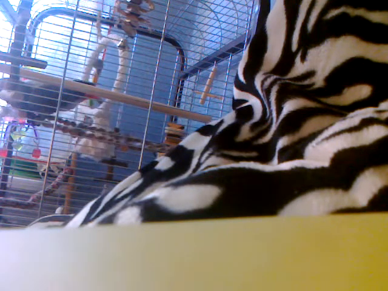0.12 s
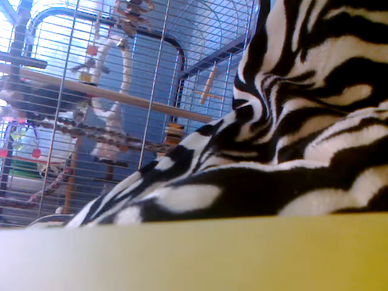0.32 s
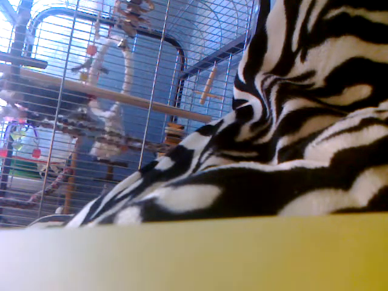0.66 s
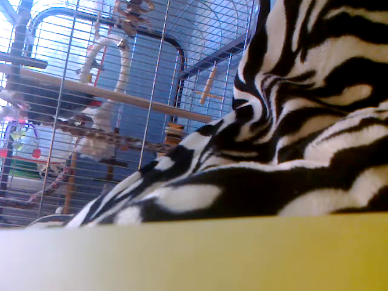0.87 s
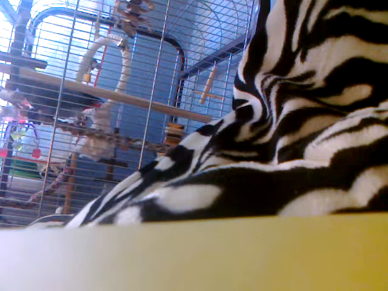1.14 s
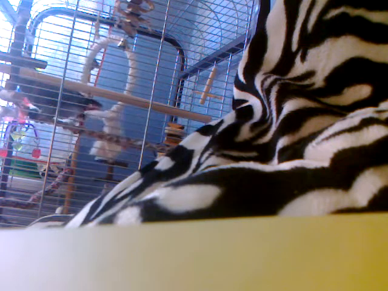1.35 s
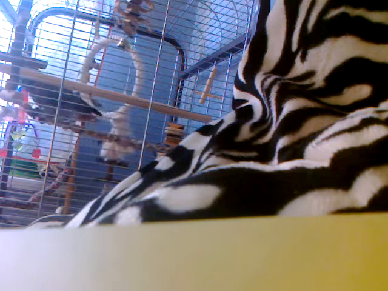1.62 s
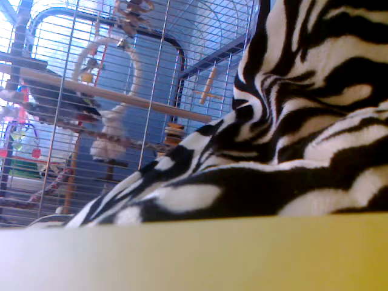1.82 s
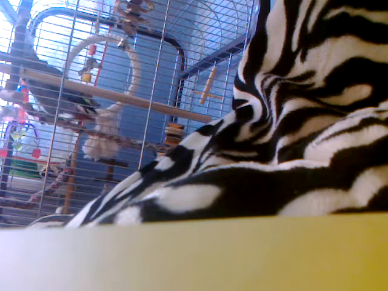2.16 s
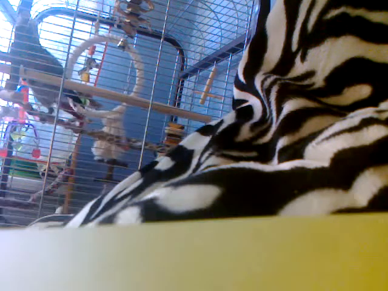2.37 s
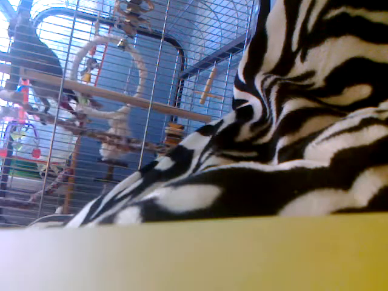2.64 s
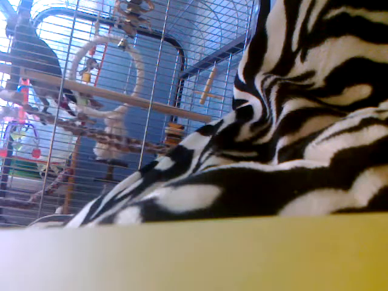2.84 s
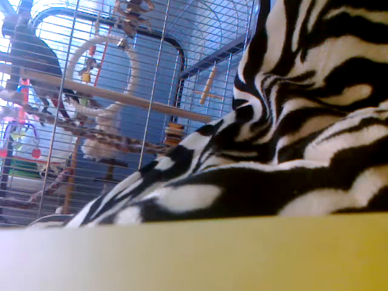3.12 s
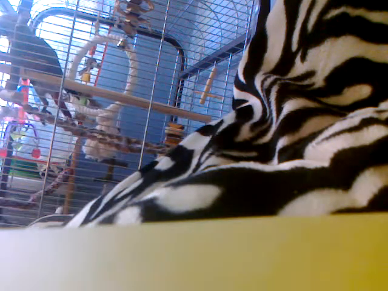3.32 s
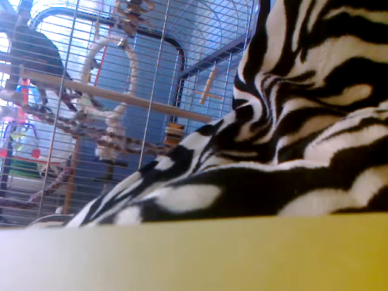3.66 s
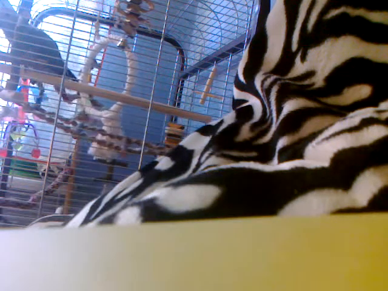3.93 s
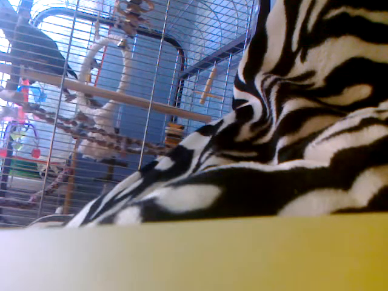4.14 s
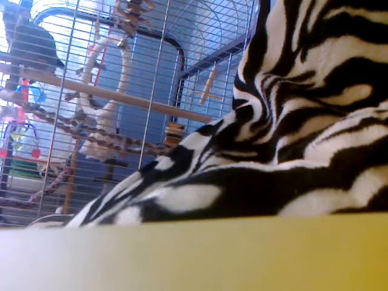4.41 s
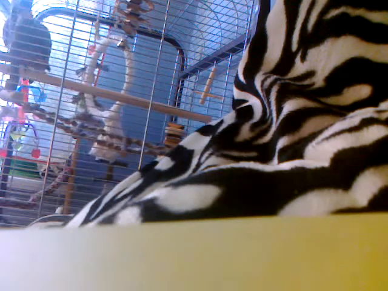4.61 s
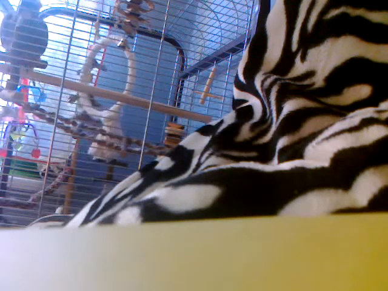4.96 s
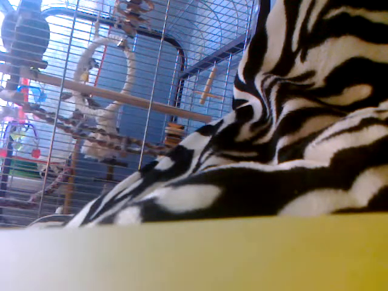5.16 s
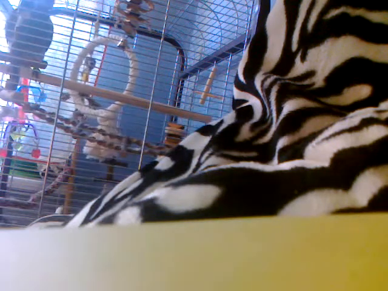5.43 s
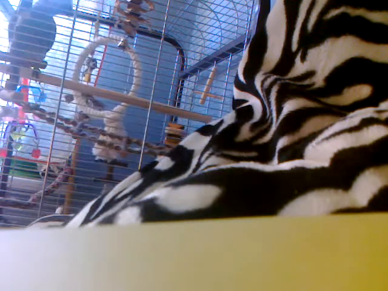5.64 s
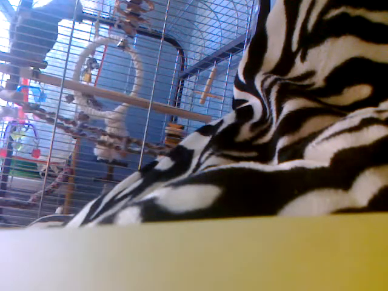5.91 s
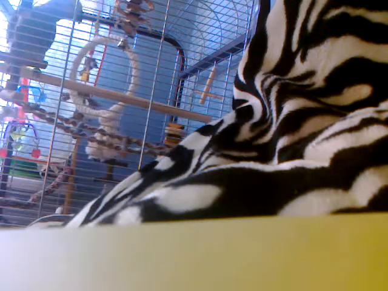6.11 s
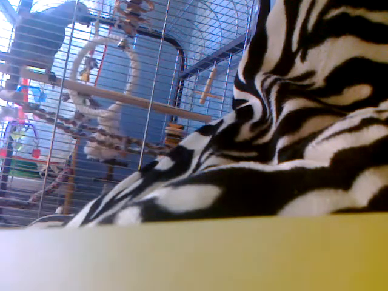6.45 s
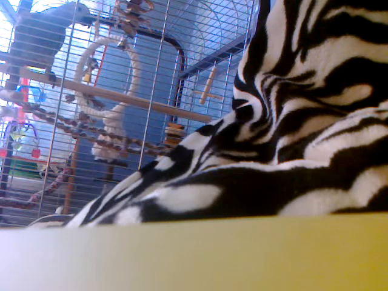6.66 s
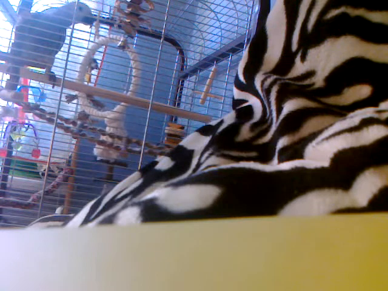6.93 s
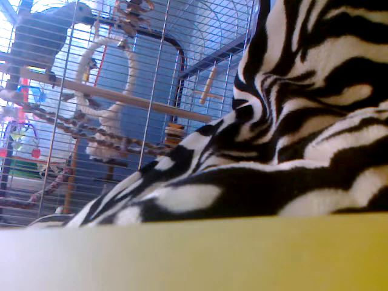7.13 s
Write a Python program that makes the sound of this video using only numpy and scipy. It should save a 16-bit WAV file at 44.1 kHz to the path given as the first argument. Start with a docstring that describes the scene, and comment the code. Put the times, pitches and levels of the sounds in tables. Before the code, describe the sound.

A low, slightly wavering appliance hum with soft air noise and hiss continues throughout in a small, lively room. At 0.1 s a soft, deep perch thud sounds, followed by faint claw scuffs on rope at 0.2-0.35 s. More scuffs and a thud come around 1.2-1.35 s, then two quiet beak taps at 1.75 s and another thud near 2 s. At 2.57 s a beak click comes with a tiny squeak; at 2.87 s a rounded hollow pop has quick echoes, with dull bumps beneath. Sparse scratchings follow from 3 to 4.4 s, with a thud at 4.4 s. A very faint high peep comes at 4.9 s. Beak taps gather from 5.0 to 5.4 s, then hard loud snaps hit at 5.56, about 5.74 and 5.92 s, the first loudest, leaving cage bars ringing metallically. Light scuffs at 6.3 s precede plain hum until about 7.4 s.

```python
"""First a soft perch thud over an appliance's hum and hiss: a parrot climbs its wire cage in a small, live room.
Claws scuff the rope as bursts of tiny ticks; the perch booms as a low tone with filtered noise.
A tiny squeak, a hollow pop with quick echoes and later a faint peep are short gliding tones with overtones.
The beak taps and snaps, three times loudly: pulses through a damped hollow that set the cage bars ringing.
One small microphone hears the bird through wall echoes and a diffuse tail; hum and hiss run throughout."""
import sys
import numpy as np
from scipy import signal
from scipy.fft import rfft, irfft, next_fast_len
from scipy.io import wavfile
from scipy.ndimage import map_coordinates

SR = 44100
rng = np.random.default_rng(int(sys.argv[2]) if len(sys.argv) > 2 else 0)


def wav_record(signal):
    """Record a signal, one row per channel, as 16-bit PCM in the file named by sys.argv[1]."""
    frames = np.transpose(np.atleast_2d(signal))
    bounded = np.clip(frames, -1, 1)
    # unit amplitude maps onto the largest positive 16-bit level
    quanta = np.round(bounded * 32767).astype(np.int16)
    wavfile.write(sys.argv[1], SR, quanta)


N = 321003
TIME = np.arange(N) / SR


def amp(db):
    """Decibels to gain."""
    return 10 ** (np.asarray(db) / 20)


def unit(x):
    """Scale to rms 1."""
    return x / np.sqrt(np.mean(x ** 2) + 1e-20)


def along(points, hz):
    """Read (f/Hz, value) points on a log frequency axis."""
    f, v = np.transpose(points)
    return np.interp(np.log(hz + 1), np.log(f), v)


def filtered(x, response):
    """Multiply the spectrum of x by a response of frequency, padded against wrap-around."""
    m = next_fast_len(len(x) + 8192)
    return irfft(rfft(x, m) * response(np.fft.rfftfreq(m, 1 / SR)), m)[:len(x)]


def noise_through(count, response):
    """White noise shaped by a response of frequency, at rms 1."""
    return unit(filtered(rng.standard_normal(count), response))


def impulse(gain, size=2048):
    """The minimum-phase pulse whose spectrum follows gain(Hz), with peak 1."""
    cepstrum = irfft(np.log(gain(np.fft.rfftfreq(size, 1 / SR)) + 1e-9))
    # Folding the cepstrum forward makes the pulse causal
    cepstrum[1:size // 2] *= 2
    cepstrum[size // 2 + 1:] = 0
    pulse = irfft(np.exp(rfft(cepstrum)))
    return pulse / np.abs(pulse).max()


def resonance(f, hz, width):
    """Gain of one resonance, 1 at its centre."""
    return f * width / np.hypot(hz * hz - f * f, f * width)


def swell(length):
    """Time around an event's middle, and a bell that stays over half height for length seconds."""
    t = np.arange(-SR // 5, SR // 5) / SR
    return t, 2 ** -(2 * t / length) ** 2


def wobble(rate):
    """A smooth random curve, rate knots a second."""
    knots = rng.standard_normal(int(N * rate / SR) + 4)
    return map_coordinates(knots, [TIME * rate])


def add(track, s, x):
    """Mix x into the track from time s."""
    start = round(s * SR)
    x = x[max(-start, 0):N - start]
    track[max(start, 0):][:len(x)] += x


# Decay of the small room's tail: f/Hz, t60/s
ROOM_DECAY = [(200, 0.29), (800, 0.46), (2000, 0.35), (5000, 0.36), (12000, 0.44)]
# Early wall echoes at the microphone: delay t/s, level/dB before the event's room level
WALL_ECHOES = [(.008, -10.5), (0.01, -8.5), (.0165, -18.5), (0.023, -18.5), (.043, -11.5)]
# Tone of direct sound and echoes, off the microphone's axis: f/Hz, level/dB
OFF_AXIS = [(2500, -2.5), (5000, -1.5), (7000, -13), (9000, -14), (15000, -27)]


def room(x, room_db, tail_db=1.0, build_s=0.00067):
    """Dulled direct sound and wall echoes, with a diffuse tail of decaying noise drawn anew each time."""
    hz, t, z = signal.stft(rng.standard_normal(SR // 2), SR, nperseg=256)
    decay = amp(-60 * t / along(ROOM_DECAY, hz)[:, None])
    build = 1 - np.exp(-(t / build_s) ** 2)
    tail = signal.istft(z * decay * build, SR, nperseg=256)[1]
    paths = np.zeros(len(tail))
    paths[0] = 1
    for delay, db in WALL_ECHOES:
        paths[round(delay * SR)] += amp(db + room_db)
    dull = impulse(lambda f: amp(along(OFF_AXIS, f)))
    early = signal.fftconvolve(paths, dull / dull.sum())[:len(tail)]
    diffuse = amp(tail_db + room_db) * tail / np.linalg.norm(tail)
    return signal.fftconvolve(x, early + diffuse)


# Beak taps and snaps: t/s, level/dB before ring and room, hollow f/Hz, hardness/dB, upper ring f/Hz
BEAK_CLICKS = [(1.738, -35.5, 1370, -6.5, 3720), (1.756, -36, 1500, -3, 3600),
               (2.559, -35.5, 2950, 11.5, 4900), (2.577, -24, 1730, 0.5, 2920),
               (2.872, -40.5, 1700, 8, 5300), (4.204, -48, 1220, -7, 3670), (5.020, -41.5, 2230, 1, 2700),
               (5.131, -34.5, 1720, -3.5, 3400), (5.142, -32.5, 1270, 1, 3600),
               (5.256, -36, 2310, 1.5, 3575), (5.276, -31.5, 1770, 5.5, 4150),
               (5.395, -30.5, 1530, 4, 3800), (5.422, -32.5, 1740, 2.5, 3950),
               (5.5499, -15.5, 2320, -5.5, 3800), (5.559, -6, 1770, 2.5, 4920),
               (5.728, -15.5, 2900, 2.5, 3802), (5.744, -20, 2120, -2, 5300),
               (5.7495, -17.5, 1280, -3.5, 2300), (5.915, -9.5, 1856, -3.5, 3840)]
# Tone of the beak's contact: f/Hz, level/dB
BEAK_TONE = [(120, -7), (250, 0), (520, -9), (780, -2), (1130, 5), (1550, 1), (1950, 2.5), (2450, 0),
             (2900, -5), (3350, -19), (4000, -16.5), (5500, -14), (7500, -20), (15000, -29)]
# Room heard with the beak, as it turns to the microphone during the climb: t/s, room level/dB
BEAK_WETNESS = [(2.6, 8), (4.2, 6.5), (5.15, -0.5)]
HOLLOW_WIDTH_HZ, WIDTH_OCTAVES_PER_DB = 1200, 0.38  # a harder contact damps the hollow more
TREBLE_DB, TREBLE_PER_DB = -1.5, 1.56  # and carries more treble
# Upper ring under the snap: it grows as the hollow rises
RING_DB, RING_HOLLOW_HZ, RING_DB_PER_OCTAVE = -21.5, 1905, 15.5
# Bars under a full-scale blow; further dB lost for each dB that a tap is lighter; dB gained per dB of hardness
WIRE_DB, WIRE_GROWS, WIRE_DB_PER_HARD_DB = -23.5, 0.16, 0.4


def clicks(skirt=0.23, ring_t60=0.0034, touch_db=-22, touch_lead_s=0.0025):
    """The beak touches, then snaps: a pulse through its damped hollow, a brief higher ring, and ringing bars."""
    out = np.zeros(N)
    for s, db, hollow_hz, hard_db, ring_hz in BEAK_CLICKS:
        width_hz = HOLLOW_WIDTH_HZ * 2 ** (WIDTH_OCTAVES_PER_DB * hard_db)
        treble = [(3000, 0.0015), (7000, TREBLE_DB + TREBLE_PER_DB * hard_db)]

        def beak_gain(f):
            """Contact tone through the hollow's resonance, over a flat skirt."""
            contact = amp(along(BEAK_TONE, f) + along(treble, f))
            return contact * (skirt + resonance(f, hollow_hz, width_hz) ** 2)

        pulse = impulse(beak_gain)
        t = np.arange(len(pulse)) / SR
        ring = np.sin(2 * np.pi * ring_hz * t) * t * 1000 ** (-t / ring_t60)
        ring_db = RING_DB + RING_DB_PER_OCTAVE * np.log2(hollow_hz / RING_HOLLOW_HZ)
        snap = amp(db) * (pulse + amp(ring_db) * ring / ring.max())
        room_db = np.interp(s, *np.transpose(BEAK_WETNESS))
        add(out, s - touch_lead_s, amp(touch_db) * room(snap, room_db))
        add(out, s, room(snap, room_db))
        wire_db = db + WIRE_DB + WIRE_GROWS * db + WIRE_DB_PER_HARD_DB * hard_db
        add(out, s, amp(wire_db) * wires())
    return out


# Modes of the cage bars: f/Hz, relative level/dB before random scatter, t60/s
BAR_MODES = [(936, 0, 0.17), (1220, -10, .3), (1400, -8.5, 0.39), (1560, -12, 0.28), (1888, -6.5, 0.4),
             (1990, 8, 0.38), (1985, -11, .38), (2095, 9, 0.32), (2180, -3.5, .3), (2307, -12, 0.29)]


def wires(scatter_db=4.5, attack_s=0.003):
    """The cage bars take up each blow and ring on as decaying sines, at new strengths every time."""
    t = np.arange(SR // 2) / SR
    ring = np.zeros(len(t))
    for hz, db, t60 in BAR_MODES:
        strength = amp(db + rng.normal(0, scatter_db))
        ring += strength * 1000 ** (-t / t60) * np.sin(2 * np.pi * (hz * t + rng.random()))
    return ring * (1 - np.exp(-(t / attack_s) ** 2)) / np.sqrt(len(BAR_MODES))


# Short calls: t/s, length t/s, f/Hz, level/dB before the room, overtones level/dB, room level/dB
BIRD_CALLS = [(2.5584, 0.0038, 1599, -24.5, -1.5, -2.5), (2.569, 0.0065, 1601, -27.5, -13, -2),
              (2.8714, .0036, 1470, -17, -37.5, 2), (2.893, 0.0081, 1407, -25, -57, -17),
              (2.915, 0.0072, 1400, -24.5, -55, -7), (4.906, .036, 4430, -63.5, -42, -4)]
# Overtones of a call: multiple of its pitch, level/dB before the call's overtone level
CALL_OVERTONES = [(2, -6), (3, -8), (4, -15), (5, -25)]
GLIDE_OCTAVES_PER_S, RASP = -.5, 0.22  # every call sags a little; its phase flutters (radians rms)


def calls(rasp_hz=260):
    """Squeak, pop and its echoes, and a faint peep: raspy gliding tones whose overtones gather at the crest."""
    out = np.zeros(N)
    for s, length, hz, db, overtone_db, room_db in BIRD_CALLS:
        t, bell = swell(length)
        flutter = noise_through(len(t), lambda f: 1 / (1 + (f / rasp_hz) ** 2))
        pitch_hz = hz * 2 ** (GLIDE_OCTAVES_PER_S * t)
        phase = 2 * np.pi * np.cumsum(pitch_hz) / SR + RASP * flutter
        tone = bell * np.sin(phase)
        for multiple, partial_db in CALL_OVERTONES:
            tone = tone + amp(overtone_db + partial_db) * bell ** 2 * np.sin(round(multiple) * phase)
        add(out, s + t[0], amp(db) * room(tone, room_db))
    return out


# Steps on the perch: t/s, length t/s, thud tone's level/dB, sole scuff's level/dB before the scuffs' common trim
PERCH_STEPS = [(0.082, 0.039, -39, -58), (1.305, 0.057, -39, -66), (1.978, 0.021, -40, -54.5),
               (2.791, 0.058, -40, -63), (2.857, 0.046, -38.5, -61), (4.414, 0.094, -39, -61.5),
               (5.185, .036, -42.5, -61)]
PERCH_HZ, SWAY_DB = 140.5, -15.5  # the perch's boom, and the cage's sway under it


def thuds(rattle_db=-16):
    """The bird's shifting weight sets the perch booming softly, over a deeper sway of the cage."""
    out = np.zeros(N)
    for s, length, db, _ in PERCH_STEPS:
        t, bell = swell(length)
        rattle = noise_through(len(t), lambda f: resonance(f, PERCH_HZ, 390) ** 2)
        sway = noise_through(len(t), lambda f: resonance(f, 57, 40) ** 2)
        tone = np.sin(2 * np.pi * (PERCH_HZ * t + rng.random()))
        boom = tone + amp(rattle_db) * rattle + amp(SWAY_DB) * sway
        add(out, s + t[0], amp(db) * bell * boom)
    return out


# Claw scuffs on the rope: t/s, length t/s, level/dB before the common trim and the room
CLAW_SCUFFS = [(.215, 0.074, -59.5), (.342, 0.057, -55.5), (1.22, 0.054, -59), (1.335, 0.038, -55),
               (1.85, 0.071, -56.5), (2.309, 0.022, -55), (2.343, 0.041, -55.5), (2.838, 0.0073, -52.5),
               (3.015, 0.014, -55.5), (3.331, 0.044, -53.5), (3.676, 0.26, -61.5), (4.236, 0.1, -57),
               (4.335, 0.047, -53.5), (5.35, 0.044, -55.5), (5.412, 0.024, -48), (6.315, 0.034, -59.5),
               (6.361, 0.035, -54.5)]
# Tone of the rope's fibres: f/Hz, level/dB
ROPE_TONE = [(300, -7), (900, 0.5), (1700, 2.5), (3000, -4), (4300, -9), (6000, -19.5), (14000, -22)]
SCUFF_S, SCUFF_BRIGHTENS = 0.041, 4.1  # length of an untilted scuff; dB per octave gained as the length halves
FOOT_S, FOOT_LEAD_S = 0.11, .01  # the sole's scuff: length, and lead before the thud
# Faint scuffs at random while the bird climbs; their level is before the trim
FIDGETS_PER_S, FIDGET_S, FIDGET_DB, CLIMB_END_S = 2, 0.055, -67, 6.1


def scuffs(grains_per_s=600, scatter_db=5, room_db=-1, trim_db=-4):
    """Claws catch on rope fibres: a short swell of tiny uneven ticks, the quicker the brighter."""
    out = np.zeros(N)
    feet = [(s - FOOT_LEAD_S, FOOT_S, db) for s, _, _, db in PERCH_STEPS]
    fidget_times = CLIMB_END_S * rng.random(round(FIDGETS_PER_S * CLIMB_END_S))
    fidgets = [(s, FIDGET_S, FIDGET_DB) for s in fidget_times]
    for s, length, db in [*CLAW_SCUFFS, *feet, *fidgets]:
        t, bell = swell(length)
        tilt_db = SCUFF_BRIGHTENS * np.log2(SCUFF_S / length)
        caught = rng.random(len(t)) < grains_per_s / SR
        sizes = amp(scatter_db * rng.standard_normal(len(t)))
        ticks = caught * rng.choice([-1, 1], len(t)) * sizes

        def rope_gain(f):
            """Rope tone with the tilt of this scuff's speed."""
            return amp(along(ROPE_TONE, f) + tilt_db * np.log2(np.clip(f, 700, 6000)))

        scuff = unit(filtered(ticks, rope_gain))
        add(out, s + t[0], amp(db + trim_db) * room(bell * scuff, room_db))
    return out


# Hum lines of the appliance: f/Hz, middle level/dB rms
HUM_LINES = [(120, -49.5), (240, -82.5), (300, -83.5), (471.5, -66.5)]
# Rumble bands of the appliance: f/Hz, half-width f/Hz, level/dB rms
RUMBLE_BANDS = [(59.6, 5.1, -68.5), (131, 7.1, -59.5), (152.7, 11.8, -60), (265, 23, -75)]


def appliance(waver_db=1.58):
    """A motor's hum lines waver slightly over its narrow bands of rumble."""
    out = np.zeros(N)
    for hz, db in HUM_LINES:
        level = amp(db + waver_db * wobble(2.78))
        out += level * np.sqrt(2) * np.sin(2 * np.pi * (hz * TIME + rng.random()))
    for hz, width, db in RUMBLE_BANDS:
        out += amp(db) * noise_through(N, lambda f: resonance(f, hz, 2 * width) ** 2)
    return out


# Spectrum of the room's air and the microphone's hiss: f/Hz, relative level/dB
AIR_TONE = [(20, 5.5), (45, -2), (90, -3), (200, -4.5), (330, -8.5), (560, -13), (800, -10.5), (1300, -16),
            (2000, -25), (3000, -30), (6000, -28.5), (10000, -29), (15500, -32)]


def air(level_db=-57):
    """Moving air in the room, and microphone hiss above it, as one shaped noise."""
    return amp(level_db) * noise_through(N, lambda f: amp(along(AIR_TONE, f)))


def scene():
    """The bird and the room's steady sound at one microphone."""
    bird = clicks() + calls() + scuffs() + thuds()
    return (bird + appliance() + air())[None]


TOP_HZ = 15800


def record(dry):
    """The recorder keeps nothing above its band limit."""
    return np.array([filtered(x, lambda hz: hz < TOP_HZ) for x in dry])


dry = scene()
out = record(dry)
wav_record(out)
```